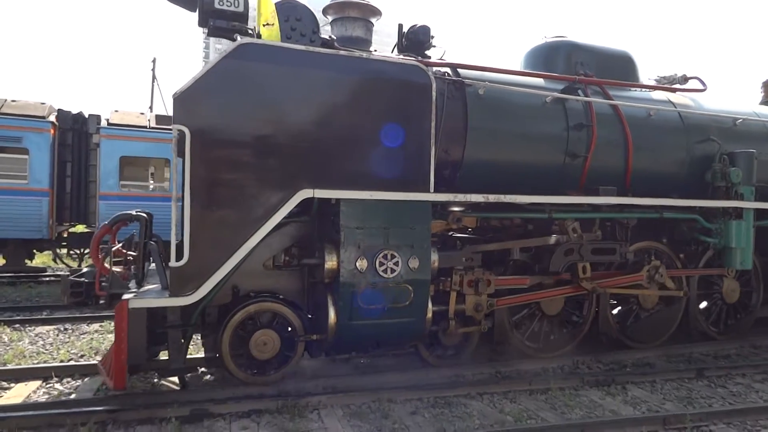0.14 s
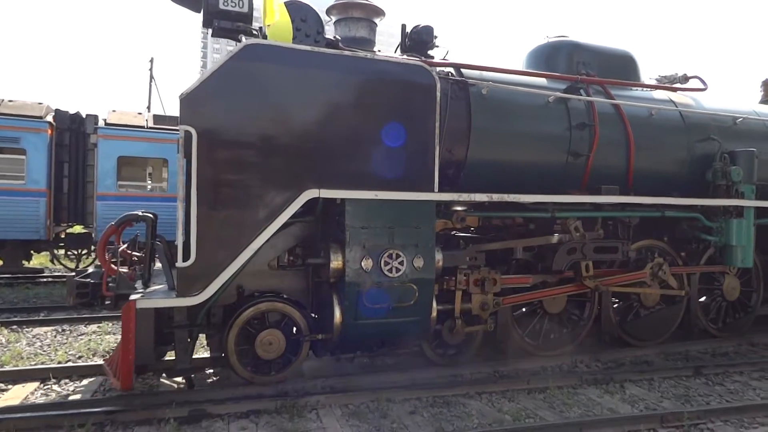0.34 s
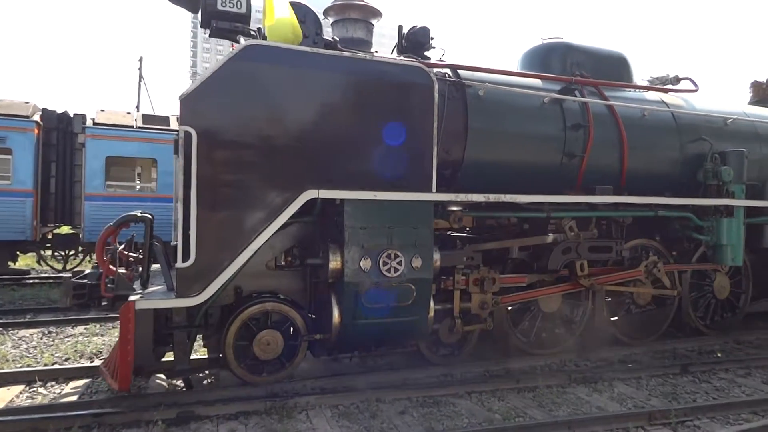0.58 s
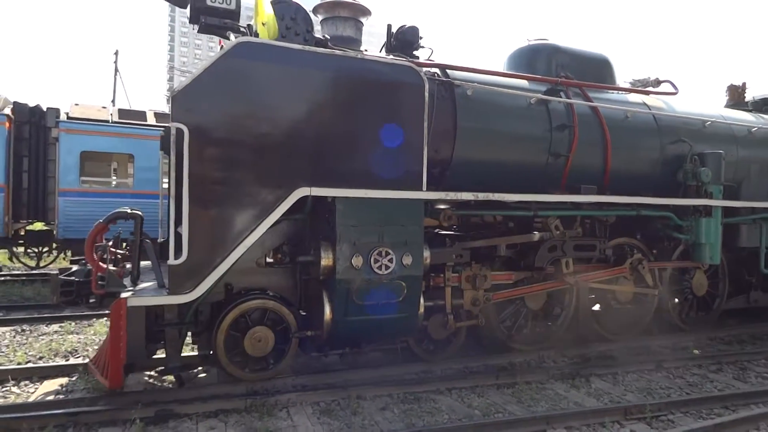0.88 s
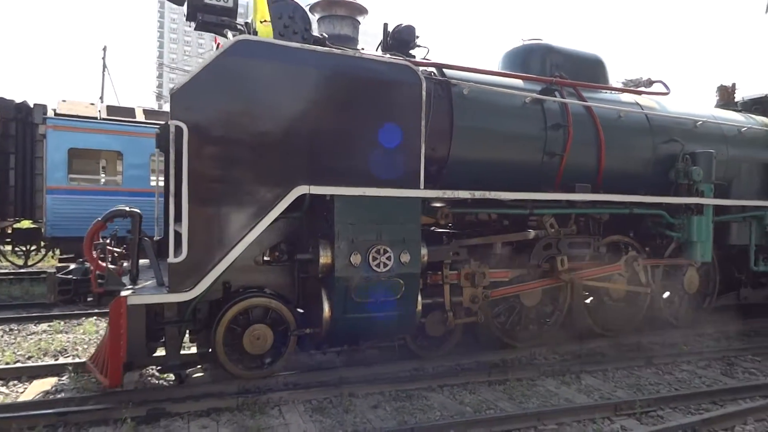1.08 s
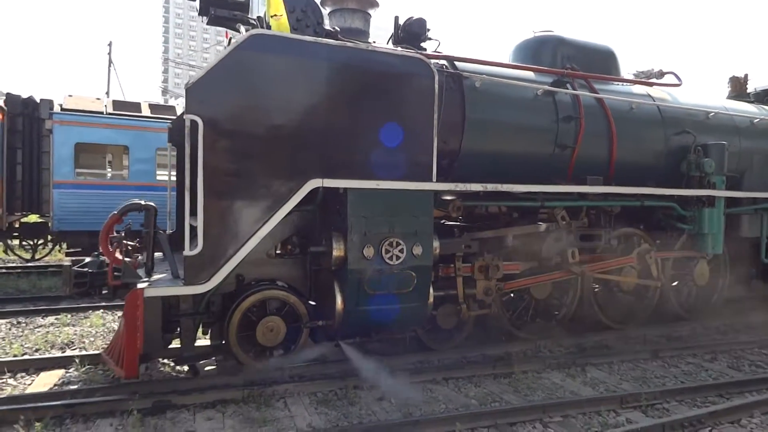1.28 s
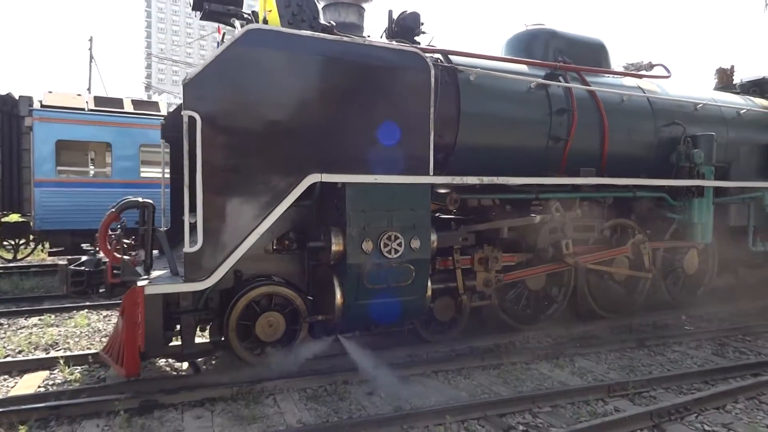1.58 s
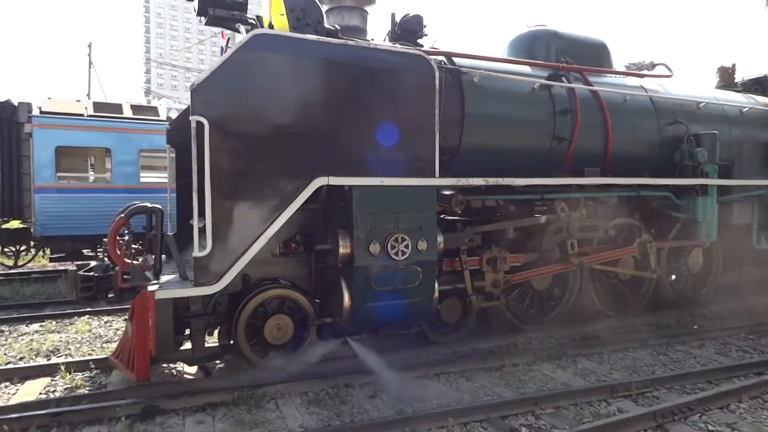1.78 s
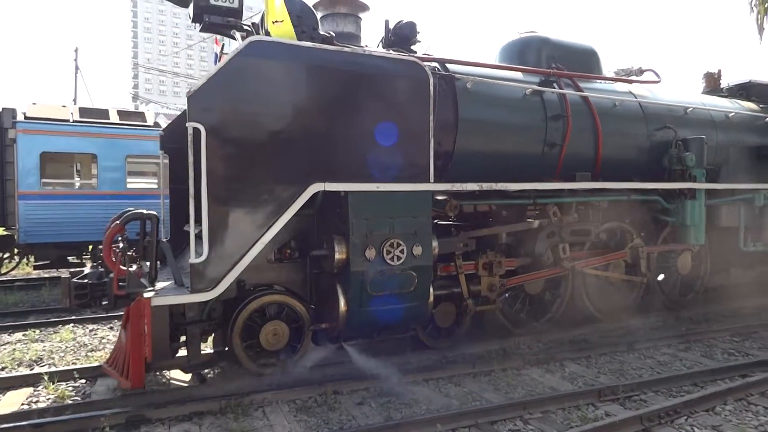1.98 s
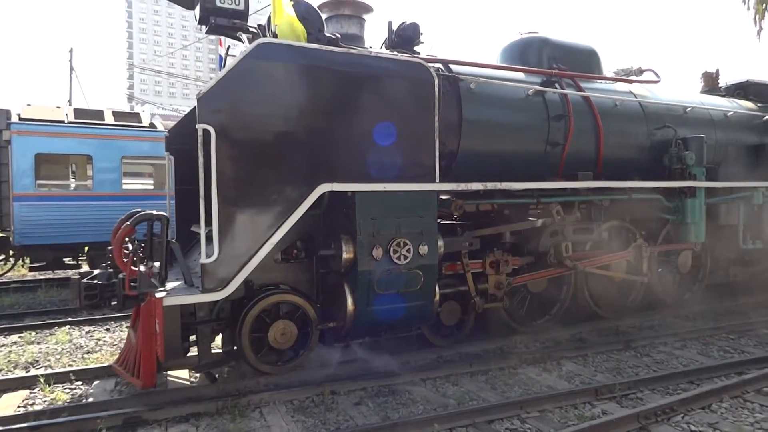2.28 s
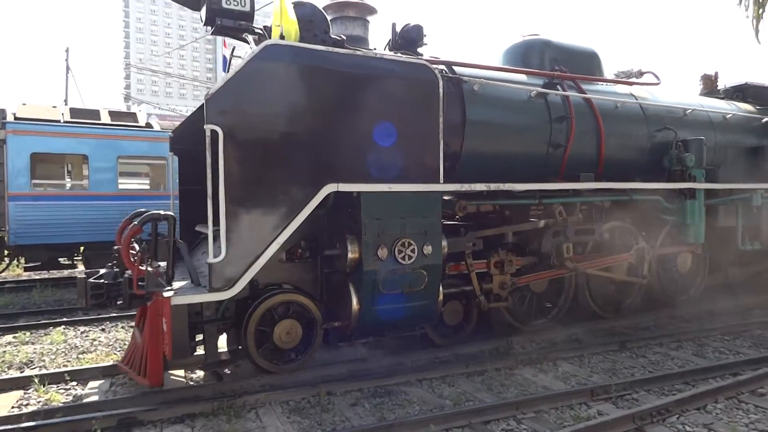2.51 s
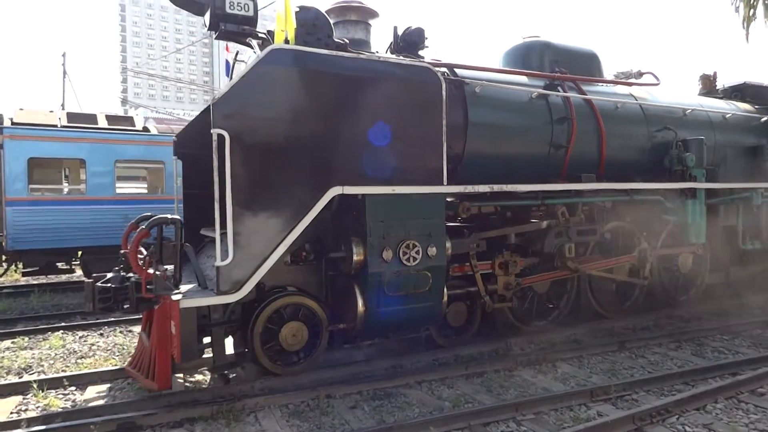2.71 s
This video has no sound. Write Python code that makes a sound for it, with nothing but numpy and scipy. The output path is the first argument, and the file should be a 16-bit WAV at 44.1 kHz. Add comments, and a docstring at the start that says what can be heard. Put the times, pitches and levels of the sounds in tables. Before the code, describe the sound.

Loud steady steam hiss from a locomotive's drain, with a breathy, rising high whistle, outdoors

```python
"""Steam blows from the cylinder drains of a standing locomotive, a few metres away in an open depot.
The jet is noise shaped into a smooth, bright hiss; a narrow band of noise near 10 kHz adds a breathy whistle
that grows and climbs. After a second the top sizzle falls back and a front drain swells into a duller roar.
Low noise rumbles, an idling engine hums on two low tones, and faint pipe rings, echoes and yard noise surround it."""
import sys
import numpy as np
from scipy import signal
from scipy.fft import rfft, irfft
from scipy.io import wavfile
from scipy.ndimage import map_coordinates

SR = 44100
rng = np.random.default_rng(int(sys.argv[2]) if len(sys.argv) > 2 else 0)


def digitize_waveform(pressure):
    """Quantize a signal to 16-bit integers and store it at the path in sys.argv[1].

    Rows of a 2-D input are taken as channels; values are limited to [-1, 1].
    """
    field = np.atleast_2d(pressure).T
    bounded = np.clip(field, -1, 1)
    quanta = np.round(bounded * 32767).astype(np.int16)
    wavfile.write(sys.argv[1], SR, quanta)


N = 125685   # length of the sound in samples

# Breathy whistle of the jet: (time [s], centre [Hz], level [dB], width [Hz])
WHISTLE_PATH = [(0, 9800, -48, 601.5), (.3, 9850, -26.5, 599), (.65, 10020, -24, 450),
                (.95, 10400, -24.5, 496), (1.12, 10130, -24.5, 599), (1.35, 10040, -21.5, 622),
                (1.6, 9870, -23, 422), (1.78, 9930, -20.5, 501), (1.98, 10300, -17.5, 547),
                (2.15, 10520, -18.5, 524), (2.38, 10760, -18.5, 723), (2.55, 11060, -18.5, 1003),
                (2.85, 11160, -20, 953)]
# Loudness of the main hiss: (time [s], level [dB])
HISS_LOUDNESS = [(0, -18.5), (.1, -17.6), (.4, -17.5), (.75, -18), (1.1, -18), (1.5, -17.5), (1.8, -18),
                 (2.05, -20), (2.2, -20), (2.36, -19), (2.58, -20), (2.7, -18), (2.85, -21)]
# Loudness of the top sizzle: (time [s], level [dB])
SIZZLE_LOUDNESS = [(0, -23), (.16, -21), (.35, -21.5), (.8, -19.5), (1.07, -19.5), (1.19, -23.5),
                   (1.7, -24.5), (2.05, -24.5), (2.35, -23.5), (2.52, -23), (2.85, -24)]
# Loudness of the duller roar: (time [s], level [dB])
ROAR_LOUDNESS = [(0, -36), (.75, -36.5), (1.08, -35.5), (1.28, -33), (1.75, -33.5), (2.05, -37.5),
                 (2.35, -35.5), (2.85, -38)]
# Loudness of the low rumble: (time [s], level [dB])
RUMBLE_LOUDNESS = [(0, -50.5), (.44, -50), (.52, -54), (1.1, -51), (1.22, -49), (1.45, -46), (1.85, -49.5),
                   (2.2, -51), (2.85, -51)]

# Colours of the noises. Only the shape counts, as each noise is then scaled to rms 1.
# Main hiss: (frequency [Hz], relative level per Hz [dB])
HISS_COLOUR = [(1500, -30), (2700, -13.5), (2980, -2.5), (3330, -3.5), (3560, -4.5), (3750, -2), (3950, -2),
               (4200, -0.5), (5200, -1), (5480, -1), (5900, 0.1), (6200, -0.5), (7500, 0), (8800, 2),
               (11000, 0.67), (17500, -17)]
# Top sizzle: (frequency [Hz], relative level per Hz [dB])
SIZZLE_COLOUR = [(7000, -26), (10500, 0), (12700, 7), (18000, -1.5)]
# Duller roar: (frequency [Hz], relative level per Hz [dB])
ROAR_COLOUR = [(300, -18.5), (500, -14.5), (670, -8.5), (850, -6), (980, -10), (1120, -7), (1330, -5.5),
               (1480, -7), (1770, -1), (1980, -4), (2120, -8.5), (2370, 1.5), (2700, -4), (3200, -2),
               (4500, -7), (8000, -32)]
# Low rumble: (frequency [Hz], relative level per Hz [dB])
RUMBLE_COLOUR = [(22, -27), (45, -13), (80, -19), (120, -6), (178, 0), (215, -5.5), (290, -7), (400, -13.5),
                 (600, -29), (1500, -50)]
# Diffuse sound of the yard: (frequency [Hz], relative level per Hz [dB])
YARD_COLOUR = [(25, -18), (100, -4), (200, -8), (480, 3.5), (700, 2), (1000, -7), (1400, -23), (2500, -45)]
# Faint side hiss around 8 kHz: (frequency [Hz], relative level per Hz [dB])
SIDE_HISS_COLOUR = [(3000, -57), (5500, -20), (8000, 10), (9500, 2), (11000, -8), (14000, -31)]

# Rings of the pipe mouth at the start: (centre [Hz], width [Hz], level [dB])
MOUTH_RING_BANDS = [(4647, 590, -27), (5910, 330, -28), (12450, 450, -38)]
# Faint steady rings of the drain pipe: (centre [Hz], width [Hz], level [dB])
PIPE_RING_BANDS = [(1070, 18, -58.5), (1326, 40, -54.5), (2006, 50, -55.5)]
# Tones of the idling engine: (frequency [Hz], level [dB])
HUM_TONES = [(50, -50.5), (100, -58)]

FLUTTER_DB, FLUTTER_HZ = 0.36, 25   # turbulence of the jet: size and speed of its level changes
WHISTLE_JITTER_HZ, JITTER_RATE_HZ = 50.1, 20   # quick waver of the whistle's pitch: size and speed
# Looser, broader hiss around the whistle's core: width, shift upwards, level against the core
SKIRT_WIDTH_HZ, SKIRT_RISE_HZ, SKIRT_DB = 1900, 222.6, -5
RING_FADE_DB_PER_S = 15.5   # the mouth rings fade as the flow settles
# Weak echoes off rails, wheels and frame; the paths shift as the listener moves
ECHO_MIN_S, ECHO_MAX_S, ECHO_DB = .002, .010, -13.5   # level of all the echoes together
PATH_WANDER_S, PATH_WANDER_HZ = .00005, .5
# A hollow drone joins as the roar swells
DRONE_HZ, DRONE_WIDTH_HZ, DRONE_DB = 178.7, 18, -53.5
DRONE_START_S, DRONE_ATTACK_S = 1.14, .1
HUM_WAVER_DB, HUM_WANDER_RAD = 1.1, .06   # small changes in the hum's level and phase
YARD_DB = -67
SIDE_HISS_DB, SIDE_HISS_FADE_DB_PER_S = -39.5, 11   # starting level and how fast it falls
WHISTLE_SIDE_DB = -21   # side whistle, against the centre one
CUTOFF_HZ = 15740   # top of the sound


def from_db(db):
    """Turn decibels into a number to multiply by."""
    return 10 ** (np.asarray(db) / 20)


def rms_one(x):
    """Scale a sound so its rms (average strength) is 1."""
    return x / np.sqrt(np.mean(x ** 2) + 1e-20)


def in_time(rows):
    """Draw straight lines between a table's times, giving each column a value for every sample."""
    seconds, *columns = np.transpose(rows)
    now = np.arange(N) / SR
    return [np.interp(now, seconds, column) for column in columns]


def coloured(x, points):
    """Make each frequency louder or softer, following a table of (frequency [Hz], level [dB])."""
    hz, db = np.transpose(points)
    bins = np.maximum(np.fft.rfftfreq(N, 1 / SR), 1)   # at least 1 Hz, so the logarithm works
    gain = from_db(np.interp(np.log(bins), np.log(hz), db))
    return irfft(rfft(x) * gain, N)


def noise(spectrum):
    """Turbulent air or steam: random noise of a given colour, rms 1."""
    return rms_one(coloured(rng.standard_normal(N), spectrum))


def drift(rate_hz):
    """Random wander around zero, rms 1, with changes faster than the rate held back."""
    bins = np.fft.rfftfreq(N, 1 / SR)
    white = rfft(rng.standard_normal(N))
    slow = irfft(white / (1 + (bins / rate_hz) ** 2), N)
    return rms_one(slow - slow.mean())


def resonant_noise(centre_hz, width_hz):
    """Noise in a resonance, rms 1: a random amplitude on a carrier; its centre and width may move."""
    per_width = 16   # steps through the random amplitude per second, for each Hz of width
    width = np.clip(width_hz * np.ones(N), 5, SR / per_width)
    travel = np.cumsum(width) * per_width / SR   # a wider band reads the amplitude faster
    white = rng.standard_normal(N + 200) + 1j * rng.standard_normal(N + 200)
    b, a = signal.butter(2, 1 / per_width)
    slow = signal.lfilter(b, a, white)[200:]   # skip the filter's start-up
    amplitude = np.interp(travel, np.arange(N), slow)
    cycles = np.cumsum(centre_hz * np.ones(N)) / SR
    carrier = np.exp(2j * np.pi * cycles)
    return rms_one((amplitude * carrier).real)


def jet():
    """Escaping steam: turbulent hiss, top sizzle and duller roar, each with its own level and colour."""
    layers = [(HISS_LOUDNESS, HISS_COLOUR), (SIZZLE_LOUDNESS, SIZZLE_COLOUR), (ROAR_LOUDNESS, ROAR_COLOUR)]
    total = 0
    for loudness, colour in layers:
        level_db = in_time(loudness)[0] + FLUTTER_DB * drift(FLUTTER_HZ)
        total = total + from_db(level_db) * noise(colour)
    return total


def whistle():
    """The jet sings unsteadily at the valve's edge: a core in a loose skirt, broader late in its climb."""
    hz, db, width = in_time(WHISTLE_PATH)
    core = resonant_noise(hz + WHISTLE_JITTER_HZ * drift(JITTER_RATE_HZ), width)
    skirt = from_db(SKIRT_DB) * resonant_noise(hz + SKIRT_RISE_HZ, SKIRT_WIDTH_HZ)
    return rms_one(core + skirt) * from_db(db)


def pipe_mouth():
    """Broad resonances of the pipe mouth colour the early hiss and fade steadily."""
    fade_db = RING_FADE_DB_PER_S * np.arange(N) / SR
    return sum(from_db(db - fade_db) * resonant_noise(hz, width) for hz, width, db in MOUTH_RING_BANDS)


def nearby_echoes(x, count=14):
    """Short, slowly shifting reflections add to or cancel the steam, rippling its spectrum."""
    echoes = 0
    for delay in rng.uniform(ECHO_MIN_S, ECHO_MAX_S, count):
        lag = (delay + PATH_WANDER_S * drift(PATH_WANDER_HZ)) * SR   # in samples
        sign = rng.choice([-1, 1])
        echoes = echoes + sign * map_coordinates(x, [np.arange(N) - lag], order=3, mode="mirror")
    return echoes * from_db(ECHO_DB) / np.sqrt(count)


def drain_pipe():
    """The flow keeps a few pipe resonances faintly ringing, then starts a low drone."""
    rings = sum(from_db(db) * resonant_noise(hz, width) for hz, width, db in PIPE_RING_BANDS)
    opening = np.clip((np.arange(N) / SR - DRONE_START_S) / DRONE_ATTACK_S, 0, 1)
    drone = from_db(DRONE_DB) * resonant_noise(DRONE_HZ, DRONE_WIDTH_HZ)
    return rings + opening * drone


def rumble():
    """Low turbulence of the steam spreading over the ballast."""
    return from_db(in_time(RUMBLE_LOUDNESS)[0]) * noise(RUMBLE_COLOUR)


def engine_hum():
    """The idling engine: two nearly steady low sine tones."""
    turn = 2 * np.pi * np.arange(N) / SR   # phase of a 1 Hz tone
    total = 0
    for hz, db in HUM_TONES:
        gain = np.sqrt(2) * from_db(db + HUM_WAVER_DB * drift(1.1))   # a sine's peak is root 2 times its rms
        start = rng.uniform(0, 2 * np.pi)
        total = total + gain * np.sin(hz * turn + start + HUM_WANDER_RAD * drift(2))
    return total


def surroundings():
    """Distant yard noise, a faint side hiss falling steadily in level, and a separate faint whistle."""
    yard = from_db(YARD_DB) * noise(YARD_COLOUR)
    side_hiss_db = SIDE_HISS_DB - SIDE_HISS_FADE_DB_PER_S * np.arange(N) / SR
    side_hiss = from_db(side_hiss_db) * noise(SIDE_HISS_COLOUR)
    return yard + side_hiss + from_db(WHISTLE_SIDE_DB) * whistle()


def scene():
    """The locomotive lies straight ahead; the surroundings, opposite in the two ears, give width."""
    steam = jet() + whistle() + pipe_mouth()
    centre = steam + nearby_echoes(steam) + drain_pipe() + rumble() + engine_hum()
    side = surroundings()
    return np.array([centre + side, centre - side])


def record(dry):
    """Cut the top steeply with a long filter."""
    taps = signal.firwin(1001, CUTOFF_HZ, fs=SR, window=("kaiser", 8))
    return signal.fftconvolve(dry, taps[None], mode="same", axes=1)


dry = scene()
out = record(dry)
digitize_waveform(out)
```